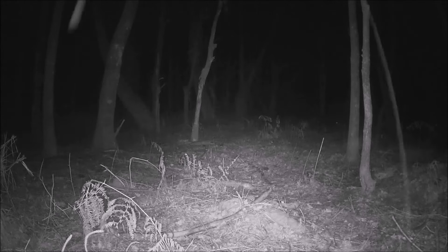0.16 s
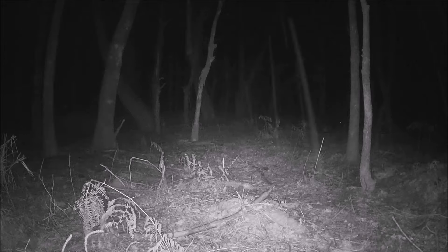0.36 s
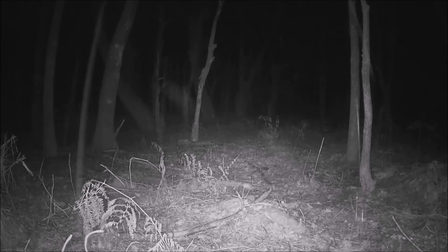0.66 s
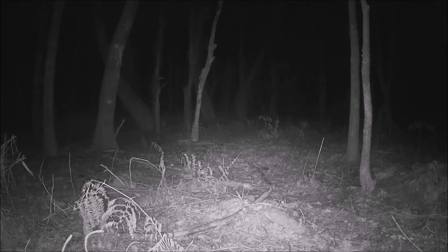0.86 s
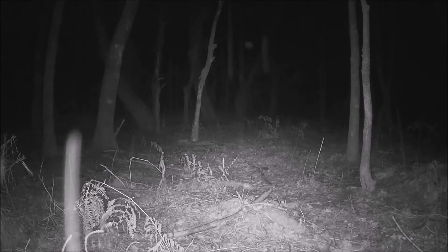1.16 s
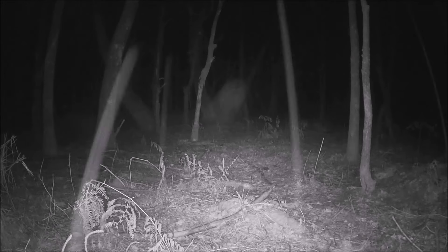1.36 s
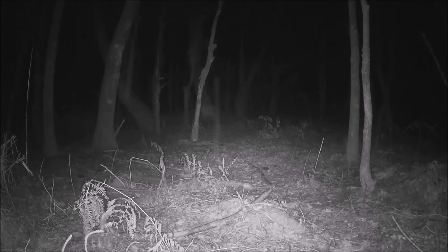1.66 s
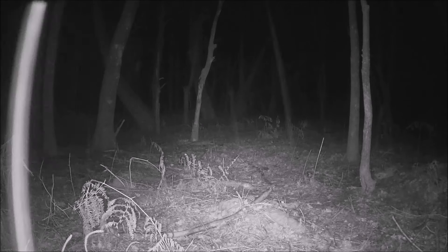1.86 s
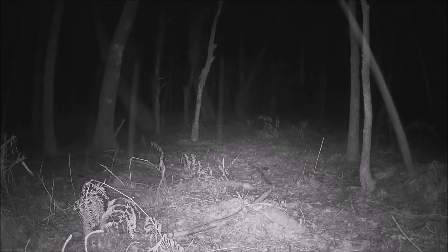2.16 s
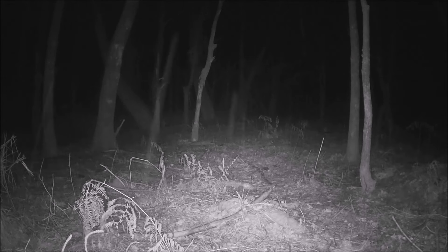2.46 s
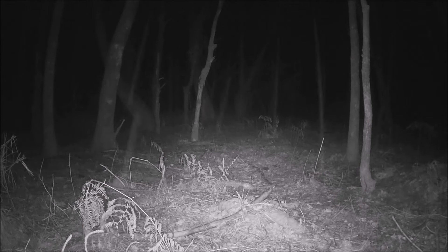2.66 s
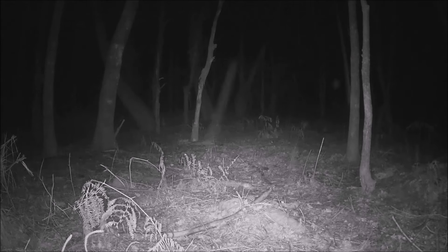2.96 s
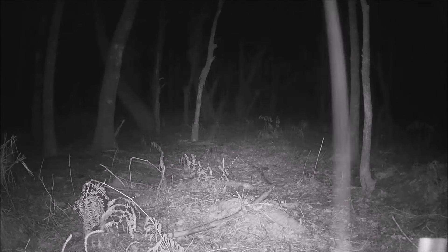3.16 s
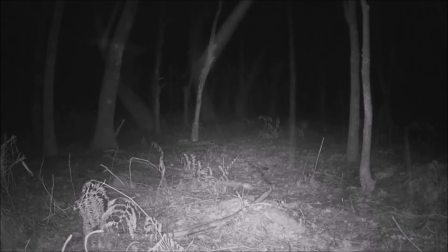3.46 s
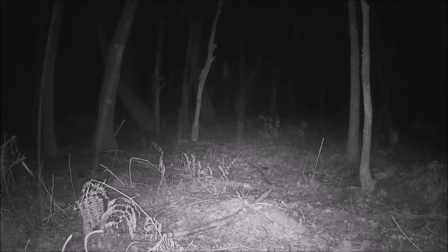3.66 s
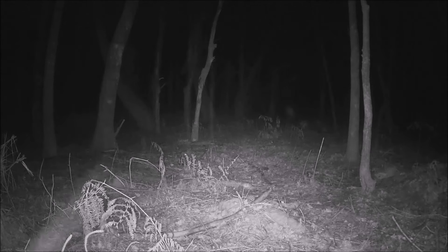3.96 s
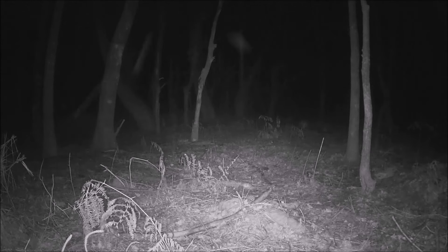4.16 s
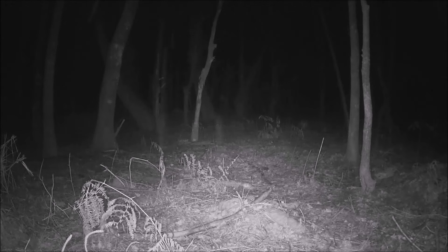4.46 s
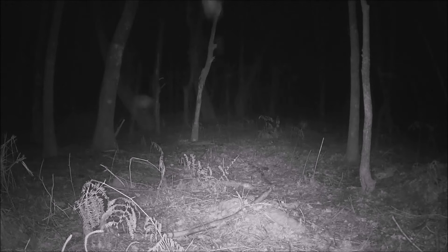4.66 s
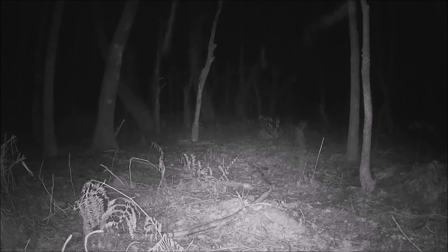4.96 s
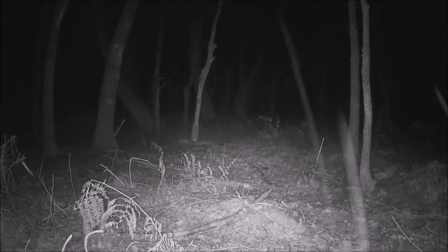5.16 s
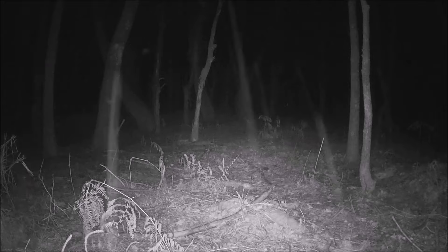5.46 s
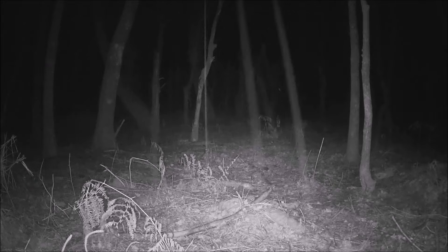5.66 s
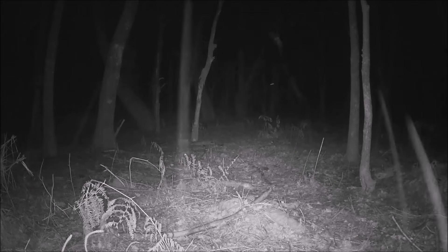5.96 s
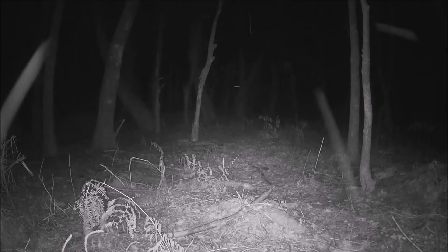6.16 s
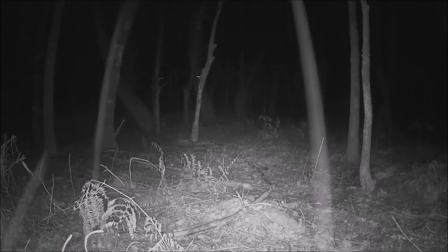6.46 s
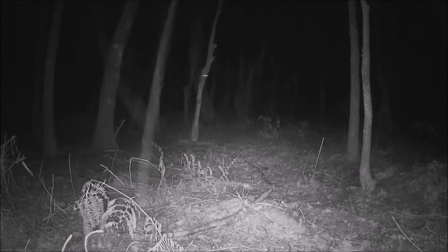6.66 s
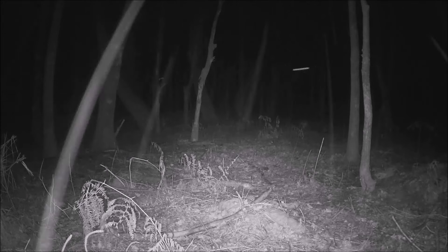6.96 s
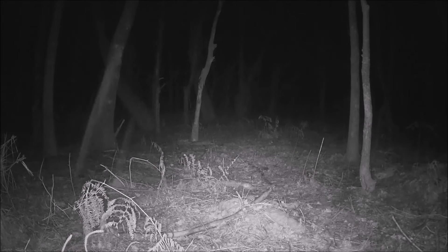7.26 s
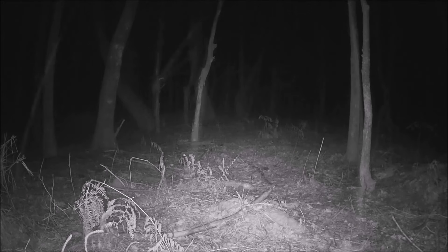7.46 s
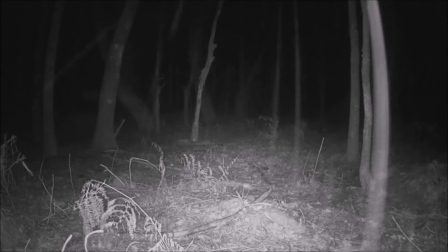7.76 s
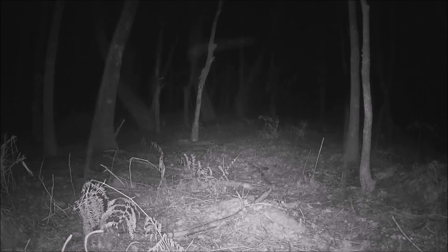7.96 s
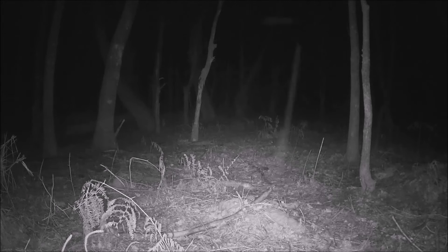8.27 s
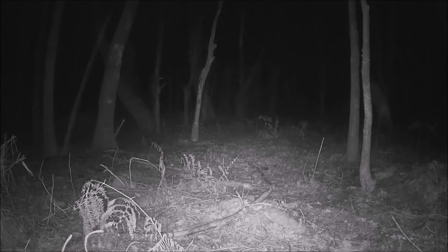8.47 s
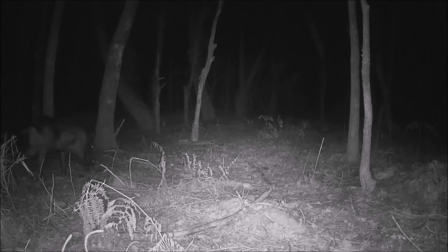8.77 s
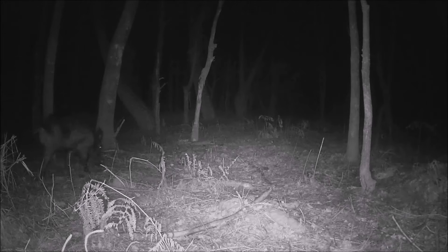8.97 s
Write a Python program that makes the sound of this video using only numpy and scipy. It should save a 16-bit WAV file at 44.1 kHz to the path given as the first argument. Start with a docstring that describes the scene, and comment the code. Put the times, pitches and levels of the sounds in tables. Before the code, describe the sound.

In a quiet wood at night, light rain falls on dry leaves and bracken very close to a trail camera's microphone. Crisp ticks, snaps and small hollow pats come irregularly over soft distant patter, flickering hiss and faint low air rumble. Near the end one heavy drop knocks sharply beside the microphone, then the camera clicks and thumps deeply, and the hiss sinks away.

```python
"""Near drops of light rain tick on dry leaves and bracken, in a wood at night, close to a trail camera.
Each is a noise burst through bands for pat, snap, tick, spray and ground knock; struck stalks ring too.
One heavy drop hits right by the microphone: a sharp knock of damped modes. Farther off, coloured noise
and clusters of small leaf sounds make the rain, over a soft, flickering hiss and low rumbling air.
Near the end the camera clicks and thumps, a step turned into a slow swing; the hiss sinks after it."""
import sys
import numpy as np
from scipy import signal
from scipy.fft import rfft, irfft
from scipy.io import wavfile
from scipy.ndimage import uniform_filter1d

SR = 44100
rng = np.random.default_rng(int(sys.argv[2]) if len(sys.argv) > 2 else 0)


def store_wav(level_fs):
    """Save 16-bit WAV to argv[1]."""
    pcm = np.round(np.clip(np.atleast_2d(level_fs), -1, 1) * 32767)
    wavfile.write(sys.argv[1], SR, pcm.T.astype(np.int16))


N = 402187
TIME = np.arange(N) / SR  # s

# Steady background, its colour: (frequency [Hz], relative level per Hz [dB])
BACKGROUND_SPECTRUM = [(10, -6.5), (30, -6), (60, -6), (120, -12), (250, -19), (500, -22), (1000, -24.5),
                       (2000, -35.5), (3500, -42), (7300, -31.5), (11000, -46.5), (16000, -39.5)]
BACKGROUND_DB = -62.5

# Puffs of air on the microphone: (time [s], level [dB], half length [s])
AIR_PUFFS = [(2.463, -57.5, 0.073), (3.6, -77, 0.41), (6.073, -59.5, 0.24), (8.117, -73, 0.21)]
AIR_DB = -69  # between puffs

# Far wash of rain, its colour: (frequency [Hz], relative level per Hz [dB])
WASH_SPECTRUM = [(300, -28), (1300, -10), (2000, -11), (3200, -13.5), (4200, -8.5), (4900, -10.5),
                 (6300, -7.5), (7400, -6), (8300, -6), (9500, -13), (11200, -19.5), (15500, -29.5)]
# Patter at middle distance, its colour: (frequency [Hz], relative level per Hz [dB])
PATTER_SPECTRUM = [(200, 9.5), (500, -7), (1400, -1.5), (3100, -42), (3800, -4), (4800, -0.5), (6200, 4),
                   (7700, 10.5), (9300, -5), (11500, -16), (14200, 6), (16000, -36)]
RAIN_DB = -67.5
RAIN_SWING_DB, RAIN_SWINGS_PER_S = 2.0, 16  # small random flurries
HALO_DB, HALO_S = 5, 0.017  # short rise of noise before and after each clear drop: rise, half length
SINK_S, SINK_TIME_S, SINK_DB = 8.81, .03, -12  # the hiss sinks after the thump: start, duration, change

# Camera supply step, corners of the filters that round it: one low-pass, two high-pass (frequency [Hz])
COUPLING_CORNERS_HZ = (13.82, 8.7, 1.67)
THUMP_S, THUMP_STEP = 8.7471, .633  # time, height (full scale)
# Switch contacts closing; those timed past the end stay unheard: (time [s], relative level [dB])
SWITCH_CONTACTS = [(6.1, -28.5), (11, -36), (8.7494, -19.5), (12, -26)]
CLICK_TOP_HZ = 11000
CLICK_DIP_HZ, CLICK_DIP_REACH = 2170, 1.5  # the camera case swallows the middle of the click

# Stalks, twigs and stiff leaves shaken by heavier drops; the rings at 6.42-6.43 s are a smeared, lingering tone
# around the drop at 6.434 s: (time [s], pitch [Hz], level [dB], t60 [s])
STALK_RINGS = [(0.398, 730, -45.5, .012), (0.3974, 2200, -45, 0.0058), (1.1864, 520, -56, 0.0068),
               (1.1864, 2800, -50.5, 0.0019), (1.922, 1900, -53, 0.011), (2.428, 3980, -43, 0.0039),
               (2.428, 10250, -39.5, 0.0026), (2.8772, 1390, -48, 0.012), (3.3192, 2030, -43.5, 0.013),
               (3.8053, 9600, -47.5, .003), (4.868, 730, -53.5, 0.011), (4.868, 2950, -48.5, 0.0068),
               (4.868, 4740, -41.5, 0.0036), (5.419, 490, -47.5, 0.0067), (5.7437, 656, -47, 0.0049),
               (6.42, 1680, -50, 0.054), (6.4335, 1260, -49, 0.037), (6.4335, 4420, -52.5, 0.027),
               (8.3481, 520, -40.5, 0.012), (8.3481, 1020, -31, 0.0061), (8.3481, 1620, -34.5, 0.0043),
               (8.4443, 2200, -40.5, 0.008), (8.4452, 5000, -50.5, 0.0027), (8.4454, 520, -56, 0.0048)]

# Heavy drop beside the microphone, impact and rebound: (time [s], relative level [dB])
HEAVY_IMPACTS = [(8.3481, -20), (8.3486, -33)]
# What the heavy drop sets ringing: (pitch [Hz], relative level [dB], t60 [s])
HEAVY_RINGS = [(368, -23, 0.016), (1200, 1.5, 0.0042), (2500, -9.5, 0.0032), (3460, -16, 0.012),
               (5240, -5, 0.0049), (7270, 3.5, 0.0084), (8120, 2.5, 0.0036), (10360, -11, 0.0073),
               (13400, -13, 0.0023), (15600, -16, 0.0036)]

# Clearest near drops, relative levels over a millisecond; the row at 6.421 s is a long, smeared burst of noise
# leading into the drop at 6.434 s: # (time [s], splash t60 [s], pat pitch [Hz], pat level [dB], snap pitch
# [Hz], snap level [dB], # tick pitch [Hz], tick level [dB], spray level [dB])
CLEAR_DROPS = [(0.049, 0.011, 800.0, -58, 2560, -52.5, 7170, -39, -70.0),
               (0.3979, 0.0055, 1400, -47, 3700, -39, 8080, -40.5, -60),
               (0.5676, 0.004, 1330.0, -62, 6100, -41, 7700, -41.5, -68),
               (0.6279, 0.003, 980.0, -59, 4210.0, -58, 7200, -45, -70.0),
               (0.7903, 0.025, 795, -48.5, 4230, -50.5, 7400, -42.5, -58),
               (0.9168, 0.003, 1100, -66, 5200, -51, 7400, -61, -70),
               (0.9402, 0.004, 1340.0, -62, 5020.0, -52.5, 8450, -46.0, -68),
               (0.9774, 0.007, 850, -47.5, 4800, -44, 8150, -40, -70.0),
               (1.0266, 0.003, 1100, -79, 5350, -47, 7400, -53, -74),
               (1.125, 0.011, 1260.0, -68, 2880.0, -53, 8150, -46, -60),
               (1.159, 0.012, 810.0, -65, 3390.0, -62.0, 7990.0, -44, -70.0),
               (1.1864, 0.012, 930, -44.5, 5700, -35.5, 8600, -39, -70.0),
               (1.3567, 0.04, 1030, -45, 2960.0, -50, 7410.0, -42.5, -56),
               (1.6047, 0.002, 800.0, -67, 3800.0, -62, 7150.0, -47.5, -70.0),
               (1.6374, 0.009, 1030.0, -72, 6350.0, -67, 7860, -47.5, -72),
               (1.8274, 0.013, 1200.0, -49, 4000.0, -52, 6850.0, -48, -66),
               (1.86, 0.005, 1010.0, -53, 5460, -45, 7900, -39.5, -68),
               (1.922, 0.0047, 1070.0, -55, 2220.0, -55, 7050, -41, -66.5),
               (2.018, 0.021, 960, -54, 4620.0, -55, 7360, -47, -70.0),
               (2.069, 0.014, 840, -52, 5270, -47, 8900.0, -53, -70.0),
               (2.269, 0.028, 1820.0, -51.5, 4160, -53, 7600, -46.5, -70.0),
               (2.304, 0.021, 1240.0, -65, 5400, -45, 8700, -43.5, -56),
               (2.428, 0.0018, 980, -47.5, 5300, -34.5, 7400, -38.5, -54),
               (2.617, 0.014, 795, -51.5, 2580.0, -51, 7470.0, -46, -50),
               (2.6244, 0.002, 980.0, -58, 6100, -41, 7800, -43, -64),
               (2.6967, 0.004, 800.0, -58, 5040.0, -72, 7290.0, -51, -65),
               (2.7045, 0.0072, 1140, -45, 5240.0, -68, 7420.0, -46, -60.0),
               (2.8351, 0.004, 1140.0, -68, 5000.0, -48, 7790.0, -55, -76),
               (2.8767, 0.0056, 1410, -48, 3720.0, -61, 5850.0, -42.0, -75),
               (2.8906, 0.002, 1040.0, -60, 5230, -48, 6900, -39.5, -72),
               (3.001, 0.014, 1730.0, -70, 6600.0, -65, 9200, -47.5, -74),
               (3.0227, 0.002, 2600.0, -71, 6240.0, -65, 7810.0, -55, -70.0),
               (3.0551, 0.0027, 1300, -61, 4500, -73, 7400, -61, -72),
               (3.214, 0.005, 1630.0, -51, 4350.0, -54, 7550, -50, -58),
               (3.254, 0.0082, 880.0, -64, 2530, -51, 7580.0, -47.0, -53),
               (3.2625, 0.011, 800.0, -66, 2670, -39.5, 6800, -36.5, -54),
               (3.319, 0.038, 1740, -45, 4550.0, -41.5, 6900, -48, -74),
               (3.397, 0.01, 900.0, -70, 4080.0, -59, 6900, -44.5, -70.0),
               (3.4239, 0.0061, 1680.0, -52, 2560, -48, 7050, -46.5, -66),
               (3.5116, 0.011, 840.0, -52, 5500, -49, 8750, -50, -70.0),
               (3.576, 0.01, 800.0, -48.5, 2740, -54.5, 7140.0, -48, -62),
               (3.5865, 0.0034, 1020.0, -62.0, 4150.0, -65, 7950, -43.5, -70.0),
               (3.6345, 0.009, 1080.0, -59.5, 2620.0, -69, 7760, -41, -70.0),
               (3.6843, 0.015, 935, -45, 5300, -46.5, 7330.0, -49, -59),
               (3.8057, 0.0022, 820, -51, 4120, -38, 6300, -38.5, -66),
               (3.845, 0.022, 1520.0, -65, 2200.0, -60, 7200, -39.0, -70.0),
               (4.1209, 0.0084, 1240.0, -44.5, 3190.0, -58, 7500.0, -48, -70.0),
               (4.1254, 0.0028, 1040.0, -50, 2480, -52.5, 6400, -41.5, -70.0),
               (4.4152, 0.007, 1300, -50, 3220, -50, 6700, -45.5, -57),
               (4.4221, 0.002, 1500, -54, 3000, -55, 7200, -50, -62),
               (4.4316, 0.003, 800.0, -60, 2880, -48.5, 7770.0, -50, -63),
               (4.465, 0.008, 1050.0, -61.0, 6400.0, -64, 6830.0, -47.5, -76),
               (4.5885, 0.0023, 1070.0, -55, 6580.0, -68, 6750, -48.5, -77),
               (4.868, 0.0044, 980, -45, 3820, -33.5, 8000, -44.5, -72),
               (4.95, 0.085, 1500, -54, 4440, -44, 7360, -59, -77),
               (5.009, 0.011, 900.0, -72, 3990.0, -60, 6750.0, -46.5, -54.5),
               (5.121, 0.03, 800.0, -70, 5890.0, -52, 8230.0, -52, -56),
               (5.1462, 0.002, 800.0, -71, 2410.0, -64, 7850, -53, -70.0),
               (5.2822, 0.01, 2600.0, -58, 5520.0, -50, 7400, -45, -70.0),
               (5.3714, 0.0062, 800.0, -57, 2760.0, -62, 8300, -44.5, -70.0),
               (5.419, 0.01, 774, -53, 3740, -41.5, 6900.0, -44, -54),
               (5.47, 0.008, 800.0, -74, 4800, -43, 7700, -46, -71),
               (5.7437, 0.0065, 870, -43, 5200, -39.5, 5980.0, -38.5, -59),
               (6.0396, 0.028, 1830.0, -66, 6400, -47, 7100, -47, -64),
               (6.1775, 0.0065, 800.0, -72, 6530.0, -65, 7390.0, -48, -70.0),
               (6.2914, 0.002, 1100, -52, 5500, -58, 7400, -51, -72),
               (6.3206, 0.002, 1380.0, -53, 3890.0, -67, 7100, -47.5, -72),
               (6.3911, 0.01, 850.0, -47.5, 5240, -40.5, 8000, -42.5, -55),
               (6.421, 0.1, 1400, -46, 5200, -49, 7860, -46, -75),
               (6.434, 0.016, 1370, -46, 5200, -56, 7720, -47, -75),
               (6.989, 0.0054, 1090, -47, 5800, -42, 9050.0, -50, -57),
               (7.141, 0.013, 1290, -47.5, 2400, -74, 7400, -68, -76),
               (7.162, 0.01, 810.0, -49.5, 4010.0, -50, 7350, -40.5, -70.0),
               (7.1804, 0.0034, 1220.0, -60, 4270.0, -62.0, 7560, -41.5, -70.0),
               (7.3194, 0.024, 1630, -53.5, 4140.0, -69, 6800, -41.5, -74),
               (7.3885, 0.0099, 2050.0, -53, 4840, -50, 7850, -47.5, -68),
               (7.4628, 0.006, 2600.0, -65, 3290.0, -61.0, 7760, -49, -70.0),
               (7.6776, 0.04, 800.0, -68, 4040.0, -49, 6580.0, -49, -58),
               (7.8381, 0.008, 1100.0, -65.5, 4160, -50, 8400, -46, -70.0),
               (7.9712, 0.012, 815, -53, 4340.0, -52, 7000, -49, -70.0),
               (8.1974, 0.0055, 800.0, -56, 6060, -41, 8300, -38.5, -54),
               (8.4452, 0.0094, 1280, -43.5, 3720, -41.5, 8000, -46.5, -72),
               (8.5647, 0.024, 1010.0, -60, 4670.0, -57, 6700, -48, -78),
               (8.6918, 0.02, 1140, -52, 3190.0, -51, 6450, -42, -58.0)]
# Typical lighter near drop, relative levels over a millisecond:
# (splash t60 [s], pat pitch [Hz], pat level [dB], snap pitch [Hz], snap level [dB],
#  tick pitch [Hz], tick level [dB], spray level [dB])
TYPICAL_SMALL_DROP = (0.005, 1200, -63, 5000, -61, 7400, -51.5, -78)
SMALL_PER_S, SMALL_SPREAD_DB = 14, 2.5
PAT_DB, SNAP_DB, TICK_DB, SPRAY_DB = -3.06, -3, 0.65, 4  # added to the levels of every near drop
PAT_REACH, SNAP_REACH, TICK_REACH = 1.57, 1.067, 1.13  # band edges either side of the pitch (ratio)
HOLLOW_HZ, HOLLOW_REACH, HOLLOW_DB = 1350, 1.16, 1.5  # air pockets under the leaves
SPRAY_LOW_HZ, SPRAY_HIGH_HZ = 10350, 16600
KNOCK_HZ, KNOCK_REACH, KNOCK_DB = 520, 1.62, -8  # ground knock; level beside the drop's listed pat

CUTOFF_HZ = 16000


def from_db(db):
    """Decibels to gain."""
    return 10 ** (np.asarray(db) / 20)


def rms_one(x):
    """Scale to unit power."""
    return x / np.sqrt(np.mean(x ** 2) + 1e-20)


def at_level(x, db):
    """Scale a short sound to the energy of one millisecond at this level."""
    return from_db(db) * x / np.sqrt(np.sum(x ** 2) * 1000 / SR)


def add(out, s, sound):
    """Mix a sound in at time s."""
    at = int(s * SR)
    out[at:at + len(sound)] += sound[:N - at]


def coloured(x, spectrum):
    """Give x a smooth spectrum, drawn over log frequency; rms 1."""
    hz, db = np.transpose(spectrum)
    bins = np.maximum(np.arange(N // 2 + 1) * SR / N, 1)
    gain = from_db(np.interp(np.log(bins), np.log(hz), db))
    return rms_one(irfft(rfft(x) * gain, N))


def band(x, low_hz, high_hz, order=2):
    """Causal band-pass."""
    edges = [low_hz, min(high_hz, SR / 2 - 100)]
    return signal.sosfilt(signal.butter(order, edges, "band", fs=SR, output="sos"), x)


def resonance(x, hz, reach, order):
    """The band around one pitch."""
    return band(x, hz / reach, hz * reach, order)


def ring(x, hz, t60):
    """One damped mode; a unit click rings with an envelope that starts near 1."""
    r = from_db(-60 / (t60 * SR))
    w = 2 * np.pi * hz / SR
    return signal.lfilter([0, np.sin(w)], [1, -2 * r * np.cos(w), r * r], x + 1e-18)


def drift(per_s):
    """A random wander of spread about 1, with per_s turning points a second."""
    steps = rng.standard_normal(1000)
    return np.interp(TIME * per_s, np.arange(len(steps)), steps)


def flickering(x, depth_db, size=768):
    """Soft hiss with thin flickering tones, the flicker fading towards the bass; rms 1."""
    hz, _, cells = signal.stft(x, fs=SR, nperseg=size)
    flicker = rms_one(uniform_filter1d(rng.standard_normal(cells.shape), size=5, axis=0))
    depth = depth_db * np.minimum(hz / 900, 1)[:, None]
    gain = from_db(depth * flicker)
    gain = gain / np.sqrt(np.mean(gain ** 2, axis=1, keepdims=True))
    return rms_one(signal.istft(cells * gain, nperseg=size)[1][:N])


def splash(t60, settle_db, settle_t60, size=2048):
    """A drop's impact is a fast-dying noise burst; a few droplets then land on the leaves around."""
    t = TIME[:size]
    burst = rng.standard_normal(size) * from_db(-60 * t / t60)
    burst[1] += 4.5  # first contact
    # cubed noise is sparse and spiky, like single droplets
    droplets = rng.standard_normal(size) ** 3 * from_db(settle_db - 60 * t / settle_t60)
    return burst + droplets


def steady_background():
    """The soft background: coloured noise, a soft hiss with thin flickering tones."""
    noise = coloured(rng.standard_normal(N), BACKGROUND_SPECTRUM)
    return from_db(BACKGROUND_DB) * flickering(noise, depth_db=5)


def moving_air():
    """Air on the microphone: low band-passed noise that swells with each puff."""
    puffs = sum(from_db(db) * np.exp(-((TIME - s) / half_s) ** 2) for s, db, half_s in AIR_PUFFS)
    rumble = rms_one(band(rng.standard_normal(N), 13.8, 45.7))
    return (from_db(AIR_DB) + puffs) * rumble


def patter(per_s, spread_db, t60, leaf_db, count=60):
    """Drops farther off land in loose clusters, on leaves that each answer briefly at their own pitch."""
    out = np.zeros(N)
    clusters = from_db(3 * np.interp(TIME * 14, np.arange(140), rng.standard_normal(140)))
    falls = np.flatnonzero(rng.random(N) < per_s * clusters / SR)
    sizes = from_db(spread_db * np.minimum(rng.exponential(1, N), 2.3))
    struck = rng.integers(0, count, N)  # which leaf a drop falls on
    for k, leaf_hz in enumerate(np.linspace(900, 11000, count)):
        force = splash(t60, settle_db=-34, settle_t60=.05)
        mode = rms_one(ring(force, leaf_hz, 16 / leaf_hz))  # t60 of 16 cycles
        leaf = rms_one(force) + from_db(leaf_db) * mode
        for at in falls[struck[falls] == k]:
            add(out, at / SR, sizes[at] * leaf)
    return coloured(out, PATTER_SPECTRUM)


def far_rain():
    """Wash and patter swell in flurries, rise briefly before and after clear drops; the hiss sinks late."""
    halo = np.max([np.exp(-((TIME - s) / HALO_S) ** 2) for s, *_ in CLEAR_DROPS], axis=0)
    sunk = np.clip((TIME - SINK_S) / SINK_TIME_S, 0, 1)
    swing_db = RAIN_SWING_DB * drift(RAIN_SWINGS_PER_S)
    level = from_db(RAIN_DB + HALO_DB * halo + swing_db + SINK_DB * sunk)
    wash = flickering(coloured(rng.standard_normal(N), WASH_SPECTRUM), depth_db=5)
    leaves = patter(per_s=190, spread_db=3.6, t60=0.007, leaf_db=4)
    return level * (from_db(1) * wash + from_db(-3) * leaves)


def camera_switch(click_db):
    """Contacts click and the supply steps; coupling capacitors turn the step into one slow swing."""
    poles = -2 * np.pi * np.array(COUPLING_CORNERS_HZ)
    since = np.maximum(TIME - THUMP_S, 0)
    swing = np.zeros(N)
    for p in poles:  # step response, one decaying term per filter corner
        swing += p * np.exp(p * since) / np.prod([p - q for q in poles if q != p])
    out = -poles[0] * THUMP_STEP * swing
    click = band(signal.unit_impulse(256), 100, CLICK_TOP_HZ, order=1)
    click = click - resonance(click, CLICK_DIP_HZ, CLICK_DIP_REACH, order=1)
    for s, db in SWITCH_CONTACTS:
        add(out, s, from_db(db + click_db) * click)
    return out


def wood(x, wet_db, t60, size=11025):
    """Trunks and ground scatter a faint, short echo: decaying noise convolved with the sound."""
    scatter = rng.standard_normal(size) * from_db(-60 * TIME[:size] / t60)
    scatter = scatter / np.sqrt(np.sum(scatter ** 2))
    return x + from_db(wet_db) * signal.fftconvolve(x, scatter)[:N]


def stalks():
    """Each struck stalk, twig or stiff leaf rings briefly as one damped mode."""
    out, click = np.zeros(N), signal.unit_impulse(2048)
    for s, hz, db, t60 in STALK_RINGS:
        add(out, s, at_level(ring(click, hz, t60), db))
    return out


def heavy_drop():
    """One sharp knock right by the microphone: impact and rebound set damped modes ringing."""
    out, click = np.zeros(N), signal.unit_impulse(2048)
    knock = np.zeros(2048)
    for k, (hz, db, t60) in enumerate(HEAVY_RINGS):
        knock += (-1) ** k * from_db(db) * ring(click, hz, t60)  # neighbours push opposite ways
    for s, db in HEAVY_IMPACTS:
        add(out, s, from_db(db) * knock)
    return out


def hollow(force, pat_hz):
    """The pat of the litter, with the woody ring of the air pockets under the leaves."""
    pat = resonance(force, pat_hz, PAT_REACH, order=2)
    return pat + from_db(HOLLOW_DB) * resonance(pat, HOLLOW_HZ, HOLLOW_REACH, order=1)


def small_drops(count=260):
    """Lighter near drops fall at uneven gaps until the thump, each a variation on the typical one."""
    t60, pat_hz, pat_db, snap_hz, snap_db, tick_hz, tick_db, spray_db = TYPICAL_SMALL_DROP
    times = np.cumsum(rng.exponential(1, count)) / SMALL_PER_S
    weights = SMALL_SPREAD_DB * rng.uniform(-1.2, 1, count)
    ratios = 2 ** (rng.standard_normal((count, 4)) * [.5, .4, .3, .14])  # spreads in octaves
    drops = []
    for s, db, (length, pat, snap, tick) in zip(times, weights, ratios):
        if s < THUMP_S:
            drops.append((s, t60 * length, pat_hz * pat, pat_db + db, snap_hz * snap, snap_db + db,
                          tick_hz * tick, tick_db + db, spray_db + db))
    return drops


def near_drops():
    """Each splash excites the hollow litter, the leaf's snap, a bright tick, fine spray and the ground."""
    out = np.zeros(N)
    for drop in list(CLEAR_DROPS) + small_drops():
        s, t60, pat_hz, pat_db, snap_hz, snap_db, tick_hz, tick_db, spray_db = drop
        force = splash(max(t60, .002), settle_db=-40, settle_t60=.09)  # never shorter than 2 ms
        pat = at_level(hollow(force, pat_hz), pat_db + PAT_DB)
        snap = at_level(resonance(force, snap_hz, SNAP_REACH, order=1), snap_db + SNAP_DB)
        tick = at_level(resonance(force, tick_hz, TICK_REACH, order=2), tick_db + TICK_DB)
        spray = at_level(band(force, SPRAY_LOW_HZ, SPRAY_HIGH_HZ, order=3), spray_db + SPRAY_DB)
        knock = at_level(resonance(force, KNOCK_HZ, KNOCK_REACH, order=2), pat_db + KNOCK_DB)
        add(out, s, knock + pat - snap + tick + spray)
    return out


def scene():
    """Near drops, echoed by the wood, over far rain, low air rumble and a soft background."""
    bed = steady_background() + moving_air() + far_rain()
    camera = camera_switch(click_db=2.5)
    drops = wood(stalks() + heavy_drop() + near_drops(), wet_db=-23, t60=.1)
    return (bed + camera + drops)[None]


def record(dry):
    """A steep elliptic low-pass cuts the top."""
    return signal.sosfilt(signal.ellip(10, .1, 70, CUTOFF_HZ, fs=SR, output="sos"), dry)


dry = scene()
out = record(dry)
store_wav(out)
```